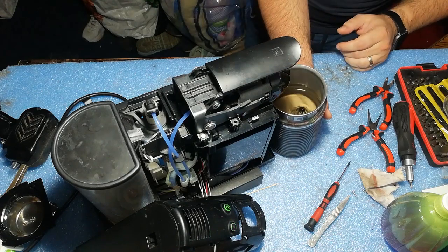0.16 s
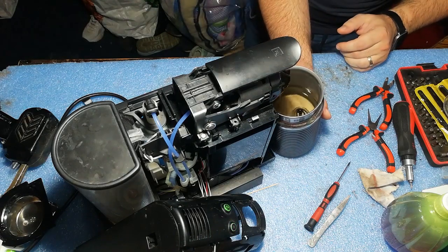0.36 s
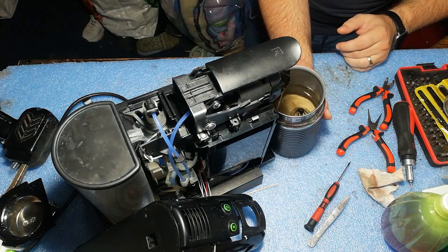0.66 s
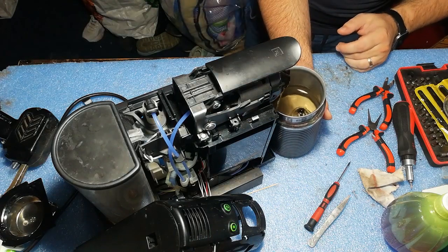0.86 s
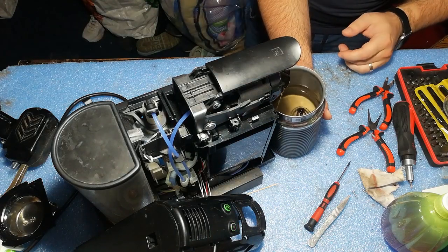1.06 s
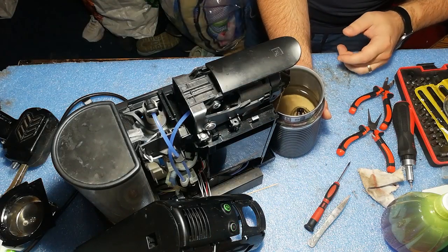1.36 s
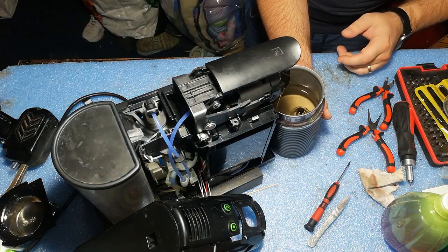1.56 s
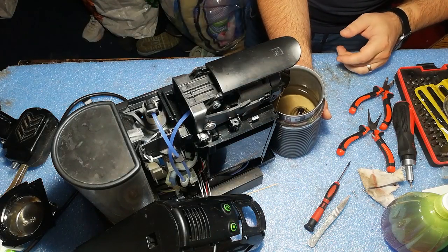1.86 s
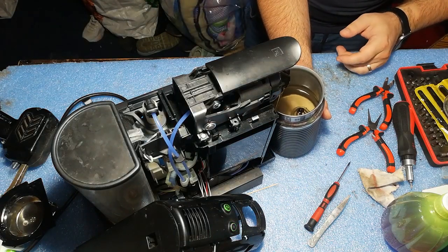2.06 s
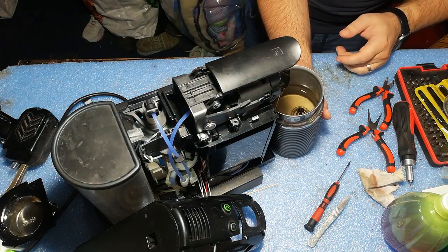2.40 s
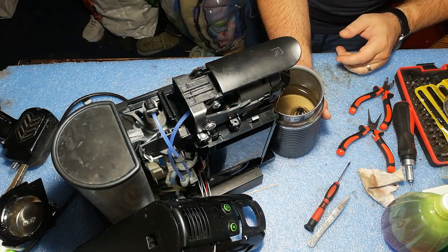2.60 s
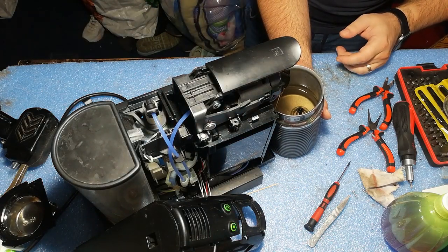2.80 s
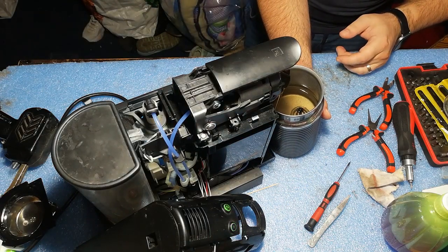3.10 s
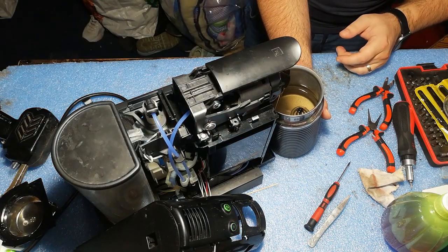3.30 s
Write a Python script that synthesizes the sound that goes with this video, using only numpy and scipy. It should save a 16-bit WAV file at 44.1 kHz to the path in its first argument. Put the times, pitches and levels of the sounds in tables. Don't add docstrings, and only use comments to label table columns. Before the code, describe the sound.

Coffee machine pump: hard, bright electric buzz with low hum, high hiss and water running into a can.

```python
import sys
import numpy as np
from scipy import signal
from scipy.io import wavfile
from scipy.ndimage import uniform_filter1d

SR = 44100
rng = np.random.default_rng(int(sys.argv[2]) if len(sys.argv) > 2 else 0)


def persist_wave(psi):
    counts = np.round(np.clip(psi, -1, 1) * 32767).astype(np.int16)
    wavfile.write(sys.argv[1], SR, np.atleast_2d(counts).T)


def voltage_ratio(decibels):
    exponent = np.asarray(decibels, float) / 20
    return 10 ** exponent


N = 152145

# t/s, pressure/0-1
PRESSURE = [(0, 0.18), (.4, 0.01), (.8, .1), (1.15, 0.43), (1.4, 0.44), (1.5, 0.79), (2.0, 0.79),
            (2.25, 0.75), (2.6, 0.74), (3.0, 0.93), (3.45, 0.82)]
# order/stroke rate, level/dB rms, left-right/dB, left lead/rad, gain with pressure/dB
HUM_ORDERS = [(1, -46, 0, -0.0, 2), (2, -59, 0, -0.1, -2), (3, -56, 0, -0.2, -2), (4, -63, 3, -0.4, 2),
              (5, -50, -1, 0.1, 0), (6, -61, 4, -0.0, -1), (7, -65, -2, -0.3, 6), (8, -60, -2, -0.7, 4),
              (9, -52, 1, -0.0, 8), (10, -53, -19, -2.9, 6), (11, -66, 4, 1.2, 0), (12, -64, -7, -2.6, 2),
              (13, -61, 0, 1.3, 11), (14, -59, 6, 1.3, -1), (15, -48, -6, 0.2, 1), (16, -47, -15, -1.0, 7),
              (17, -51, -8, 1.2, 9), (18, -58, 7, 0.6, 1), (19, -53, -4, -0.1, 2), (20, -61, -2, 0.2, 3),
              (21, -56, -2, 1.4, 5), (22, -62, 0, -0.2, 6)]
# f/Hz, level/dB per Hz
WASH_COLOUR = [(25, -3), (200, -4.5), (600, -6), (800, 2), (2500, 2.5), (6000, -4.5), (11000, 1),
               (15800, -21)]
# f/Hz, likeness/0-1
WASH_LIKENESS = [(60, 0.8), (180, 0.77), (550, 1), (1650, 0.5), (4970, 0.66), (15000, 0.09)]
# f/Hz, width/Hz, level/dB rms
FIZZ_BAND = (13000, 6300, -65)
# f/Hz, width/Hz, level/dB rms, left-right/dB
AIR_SPACES = [(458, 38, -62, 8), (847, 81, -53, -7), (962, 108, -52.5, 1.5), (1395, 127, -59, -5),
              (1780, 130, -54.5, -4), (2180, 150, -62, -2)]
# f/Hz, width/Hz, strike/dB, snap/dB, chatter/dB, left-right/dB
PUMP_PARTS = [(3176, 1230, -35, -12, -16, 2.5), (4070, 1300, -16, -12, -16, -1.5),
              (6423, 745, -7.5, -16, -14, 5), (8230, 1340, -7, -25, -11.5, 7.5),
              (9740, 950, -14, 7.5, -16.5, 1), (10316, 183, 1, 11.5, -4.5, 13.5),
              (10650, 1530, -27, -12, -12, -5), (14400, 1700, -21, -30, -20, 1),
              (15560, 1500, -32, -31, -25, 13), (7470, 320, -21, -18, -13, -9)]
# f/Hz, width/Hz, level/dB
BRIGHT_PEAKS = [(6230, 110, -15), (6750, 200, -14), (7570, 140, -16), (8070, 110, -19), (8540, 170, -13),
                (9470, 100, -14), (9810, 96, -12), (10220, 130, -7)]
# delay/s, left/dB, right/dB
REBOUNDS = [
    (.0022, -8, -4),
    (.0045, -16, -14),
]
# f/Hz, width/Hz, level/dB, left-right/dB
BODY_MODES = [(1412, 78, -5.5, -1.5), (1870, 170, -7, 3.5), (2181, 89, -6.5, -8), (2770, 48, -4, 10),
              (3243, 57, -8.5, -7), (3550, 110, -5, 3), (4380, 96, -4.5, 6)]
# t/s, peak level/dB, pitch/factor
DROPS = [
    (1.107, -39, 1.1),
    (1.6849, -28.5, 0.983),
    (1.6881, -30, 1.0),
    (1.704, -33, 1.03),
    (2.88, -37, 1.3),
]
# f/Hz, level/dB, T60/s
CAN_MODES = [(1045, .5, .035), (1285, 0.1, .045)]
# f/Hz, width/Hz, depth/0-1
BAND_DIPS = [(1980, 110, .5), (2460, 150, .6), (3180, 100, .55), (3470, 110, .65), (3880, 80, .4),
             (4140, 100, .6)]

STROKE_HZ, FIRST_STRIKE_S = 49.98, .01305
LEAD_S = .003
BURST_S, JITTER_S, SNAP_DELAY_S = .00028, .00013, .0058
FIRM = .65
SHARED = .5
STROKE_SPREAD_DB, PART_SPREAD_DB = .8, 2.0


def evened(x):
    return x / np.sqrt(np.mean(x ** 2) + 1e-20)


def read(points, hz):
    f, value = np.transpose(points)
    return np.interp(np.log(hz + 1), np.log(f + 1), value)


def resonate(x, hz, width):
    return signal.lfilter(*signal.iirpeak(min(hz, .49 * SR), hz / max(width, 5), SR), x)


def resonate_twice(x, hz, width):
    return resonate(resonate(x, hz, width), hz, width)


def sides(db):
    gains = voltage_ratio(np.array([[db / 2], [-db / 2]]))
    return gains / np.sqrt(np.mean(gains ** 2))


def slow(size, count):
    noise = rng.standard_normal((count, N))
    return evened(uniform_filter1d(uniform_filter1d(noise, size), size))


def clock():
    t = np.arange(N) / SR
    pressure = np.clip(np.interp(t, *np.transpose(PRESSURE)), 0, 1.2)
    turns = (t - FIRST_STRIKE_S + LEAD_S) * STROKE_HZ + 1
    return t, pressure, turns.astype(int), turns % 1 / STROKE_HZ - LEAD_S


def hum():
    t, pressure = clock()[:2]
    out = np.zeros((2, N))
    drift, shake = slow(size=9000, count=3), slow(size=500, count=6)
    push_s, waver_db, stroke_spread = .008, 1.3, .11
    for k, db, pan_db, lead, gain_db in HUM_ORDERS:
        order = int(round(k))
        lane = order % 3
        loose = min(k / 14, 1) ** 2
        phase = 2 * np.pi * (order * STROKE_HZ * (t - push_s) + 0.65 * rng.random())
        phase = phase + np.array([[lead / 2], [-lead / 2]])
        level_db = db - gain_db * (0.81 - pressure) + waver_db * loose * drift[lane]
        size = voltage_ratio(level_db) * np.sqrt(2)
        wobble = 1 + stroke_spread * loose * (shake[lane] + 1j * shake[3 + lane])
        out += sides(pan_db) * size * (wobble * np.exp(1j * phase)).real
    return out


def wash():
    frames, hz = N // 256 + 5, np.fft.rfftfreq(1024, 1 / SR)
    a, b, c, d, patches = rng.standard_normal((frames, 513, 5)).T
    for axis in (0, 1):
        patches = uniform_filter1d(patches, size=8, axis=axis)
    same = np.clip(read(WASH_LIKENESS, hz), -1, 1)[:, None]
    left = a + 1j * b
    right = same * left + np.sqrt(1 - same ** 2) * (c + 1j * d)
    colour = voltage_ratio(read(WASH_COLOUR, hz)[:, None] + 2.2 * evened(patches))
    noise = signal.istft(np.array([left, right]) * colour, nperseg=1024, noverlap=768)[1]
    return voltage_ratio(-42.5) * evened(noise[:, :N])


def fizz():
    hz, width, db = FIZZ_BAND
    hiss = resonate_twice(rng.standard_normal((2, N)), hz, width)
    return voltage_ratio(db + 2.5 * clock()[1]) * evened(hiss)


def hollows():
    _, pressure, _, since = clock()
    out = np.zeros((2, N))
    for hz, width, db, pan_db in AIR_SPACES:
        a, b = rng.standard_normal((2, N))
        lag_s = .004 + 0.01 * (hz < 1200)
        beat = 1 + .5 * np.cos(2 * np.pi * STROKE_HZ * (since - lag_s))
        gurgle = resonate_twice(np.array([a, 0.79 * a + 0.99 * b]) * beat, hz, 2.0 * width)
        swell = voltage_ratio(db + 2.0 * pressure + 1.2 * slow(size=2500, count=1))
        out += evened(gurgle) * sides(pan_db) * swell
    return out


def bouncing_hit(u, noise):
    def pulse(u):
        age = np.maximum(u, 0) / BURST_S
        burst = age * np.exp(1 - age) * noise
        click = abs(u - BURST_S) * SR < .5
        return np.sqrt(1 - FIRM) * burst + np.sqrt(FIRM * 2 * BURST_S * SR) * click

    out = pulse(u)
    for delay, left_db, right_db in REBOUNDS:
        out = out + voltage_ratio(np.array([[left_db], [right_db]])) * pulse(u - delay)
    return out


def valve_chatter(pressure, since, luck, noise):
    rise = np.exp(np.minimum(since, 0) / .0008)
    fall = voltage_ratio(-2313 * np.maximum(since - .0055, 0))
    level = voltage_ratio(-14.5 + 4.5 * pressure + STROKE_SPREAD_DB * luck)
    grit = np.exp(.5 * slow(size=12, count=1)[0])
    return (rise * fall + voltage_ratio(-12.5)) * level * grit * noise


def pump():
    _, pressure, stroke, since = clock()
    luck = rng.standard_normal((stroke[-1] + 1, 5 + 2 * len(PUMP_PARTS)))
    luck = np.clip(luck, -2.5, 1.5)[stroke].T
    noise = SHARED * rng.standard_normal(N) + np.sqrt(1 - SHARED ** 2) * rng.standard_normal((2, N))
    out = np.zeros((2, N))
    strike = bouncing_hit(since - JITTER_S * luck[0], noise)
    strike = strike * voltage_ratio(STROKE_SPREAD_DB * luck[2])
    snap = bouncing_hit(since - SNAP_DELAY_S - 2 * JITTER_S * luck[1], noise)
    snap = snap * voltage_ratio(9 * (pressure - 1.8) + 2 * STROKE_SPREAD_DB * luck[3])
    chatter = valve_chatter(pressure, since, luck[4], noise)
    for k, (hz, width, strike_db, snap_db, chatter_db, pan_db) in enumerate(PUMP_PARTS):
        strike_luck, snap_luck = PART_SPREAD_DB * luck[5 + 2 * k:7 + 2 * k]
        spread = 1.2 if 5000 < hz < 11000 else .5
        drive = strike * voltage_ratio(strike_db + spread * strike_luck)
        drive = drive + snap * voltage_ratio(snap_db + snap_luck) + chatter * voltage_ratio(chatter_db)
        out += (-1) ** k * sides(pan_db) * resonate_twice(drive, hz, 1.58 * width)
    drive = strike + 0.56 * snap + 2 * chatter
    for hz, width, db in BRIGHT_PEAKS:
        out += sides(6.7) * voltage_ratio(db - 14.5) * resonate(drive, hz, width) * np.sqrt(800 / width)
    return voltage_ratio(-4) * out


def nearby(x):
    t = np.arange(3000) / SR
    scatter_t60_s, right_lag_s = .03, .00013
    taps = rng.standard_normal((2, 3000)) * voltage_ratio(-60 * t / scatter_t60_s) * np.minimum(t / 0.006, 1)
    taps *= voltage_ratio(-16) / np.linalg.norm(taps[0])
    taps[1, round(right_lag_s * SR)] += 1
    taps[0, 0] += 1
    return signal.fftconvolve(x, taps, axes=1)[:, :N]


def body():
    _, _, stroke, since = clock()
    luck = rng.standard_normal((stroke[-1] + 1, len(BODY_MODES)))[stroke].T
    click = abs(since - .0006) * SR < .5
    out = np.zeros((2, N))
    for k, (hz, width, db, pan_db) in enumerate(BODY_MODES):
        ring = resonate(click * voltage_ratio(db + .5 * luck[k]), hz, width) * SR / (2 * np.pi * width)
        out += sides(pan_db) * np.array([ring, (-1) ** k * ring])
    return voltage_ratio(-36.5) * out


def drops():
    out, t = np.zeros(N), np.arange(4000) / SR
    attack = np.minimum(t / 0.00061, 1)
    for s, db, pitch in DROPS:
        at = round(s * SR)
        for hz, mode_db, t60 in CAN_MODES:
            fade = voltage_ratio(db + mode_db - 60 * t / t60)
            out[at:at + 4000] += fade * attack * np.sin(2 * np.pi * hz * pitch * t)
    return out * sides(1.5)


def scene():
    return hum() + wash() + fizz() + hollows() + nearby(pump()) + body() + drops()


def roll_off(x):
    return signal.sosfilt(signal.butter(12, 16490, fs=SR, output="sos"), x)


def record(dry):
    for hz, width, depth in BAND_DIPS:
        dry = dry - min(depth, .9) * resonate(dry, hz, width)
    lowpass = signal.firwin(511, 15730, window=("kaiser", 9), fs=SR)
    dull = signal.oaconvolve(dry, lowpass[None], "same")
    return roll_off(dull)


dry = scene()
out = record(dry)
persist_wave(out)
```